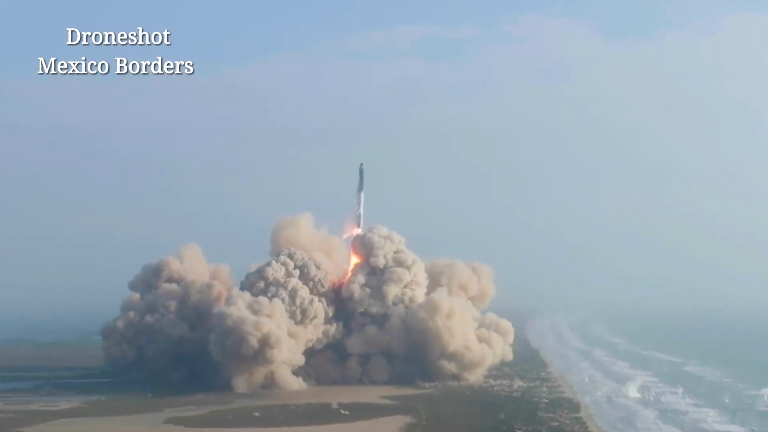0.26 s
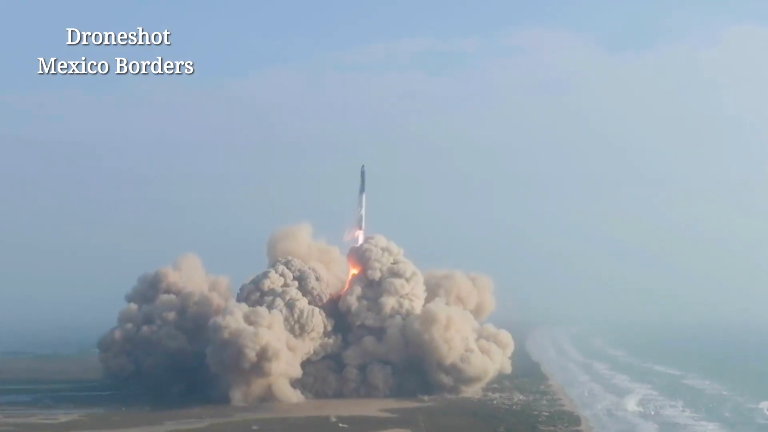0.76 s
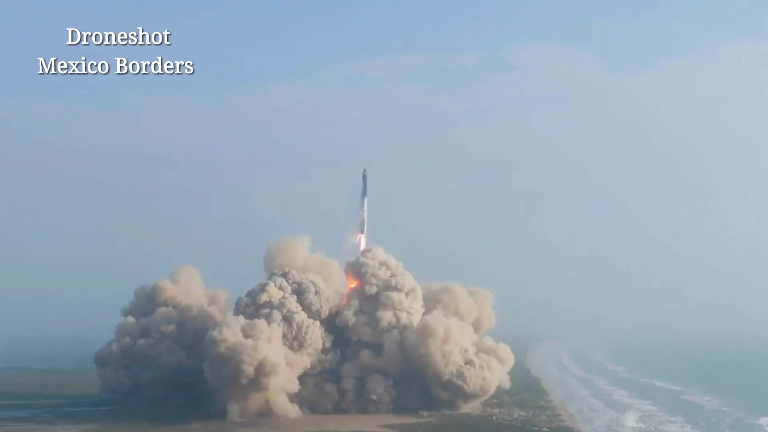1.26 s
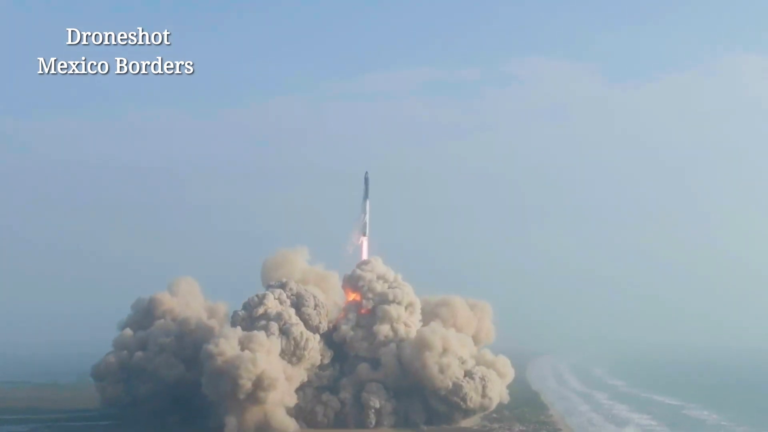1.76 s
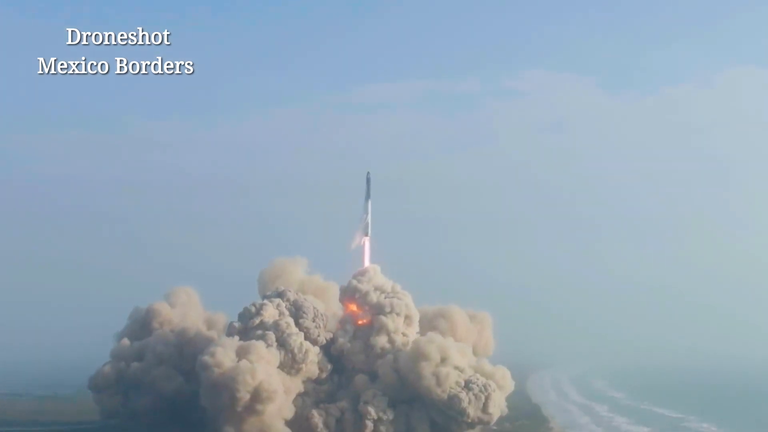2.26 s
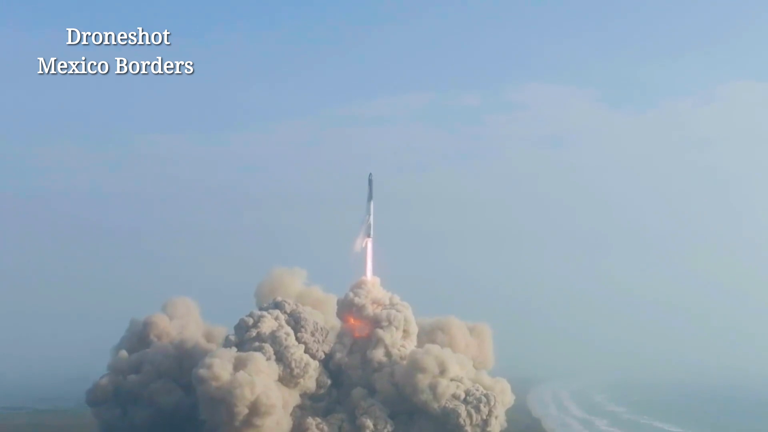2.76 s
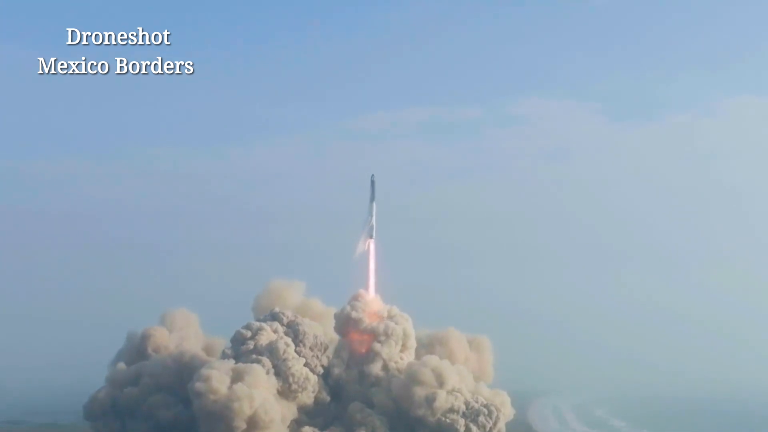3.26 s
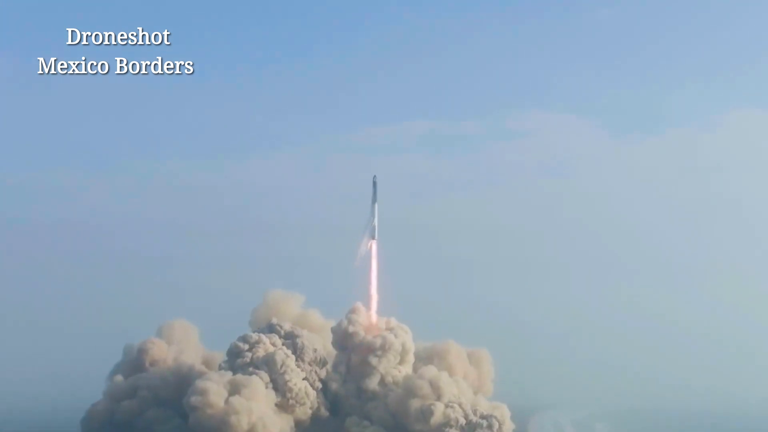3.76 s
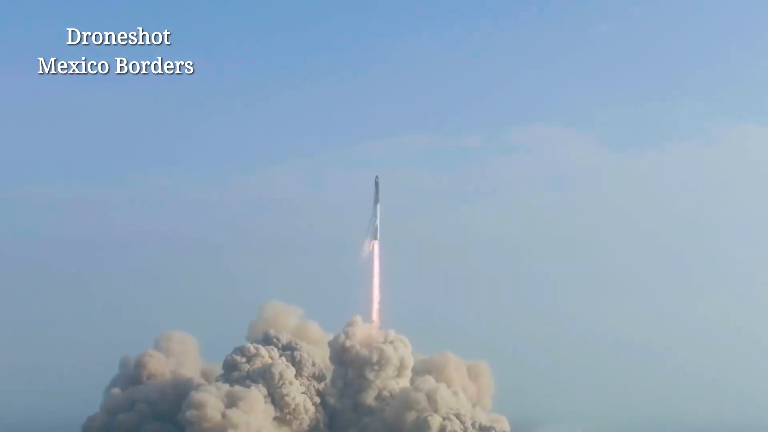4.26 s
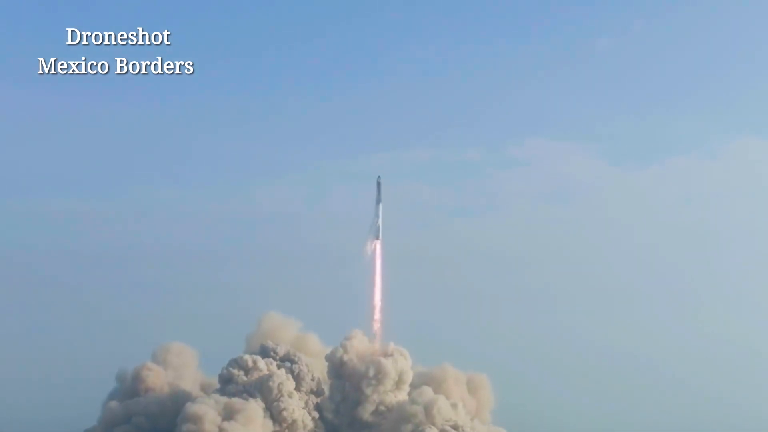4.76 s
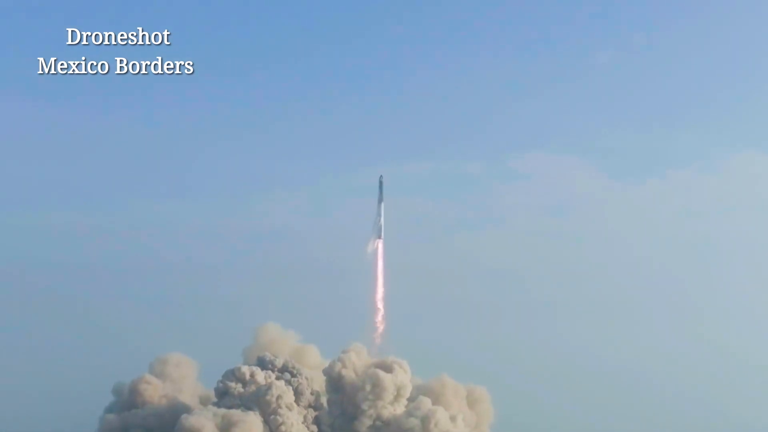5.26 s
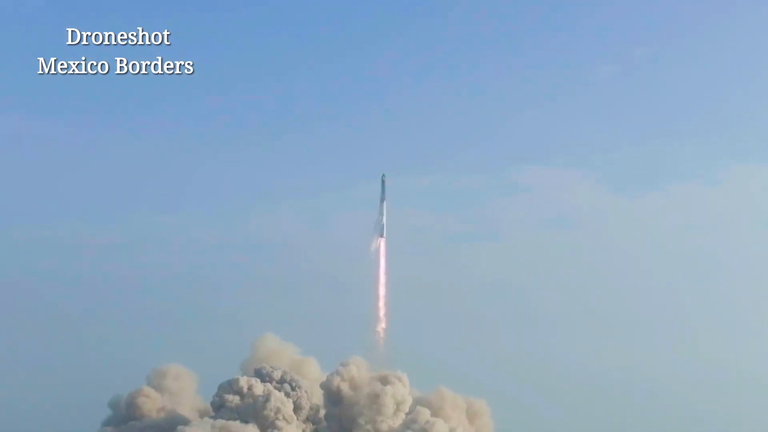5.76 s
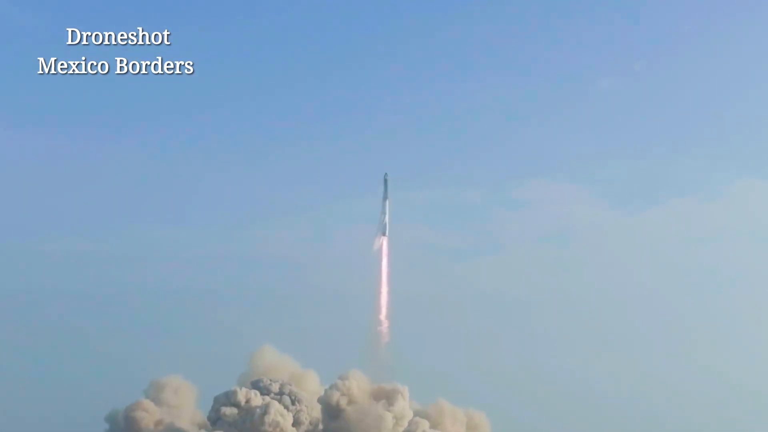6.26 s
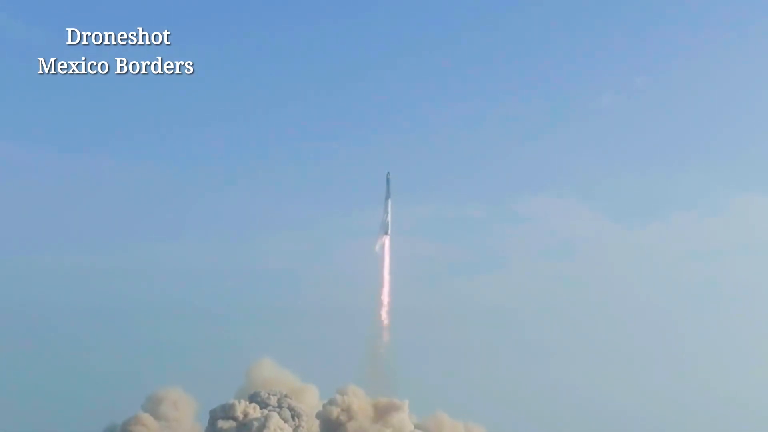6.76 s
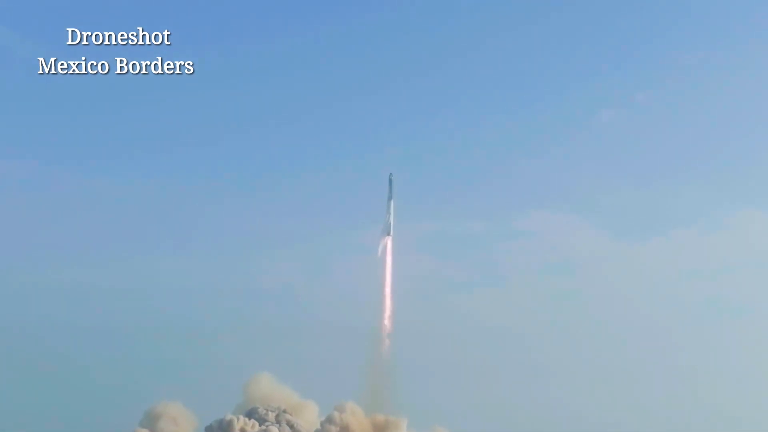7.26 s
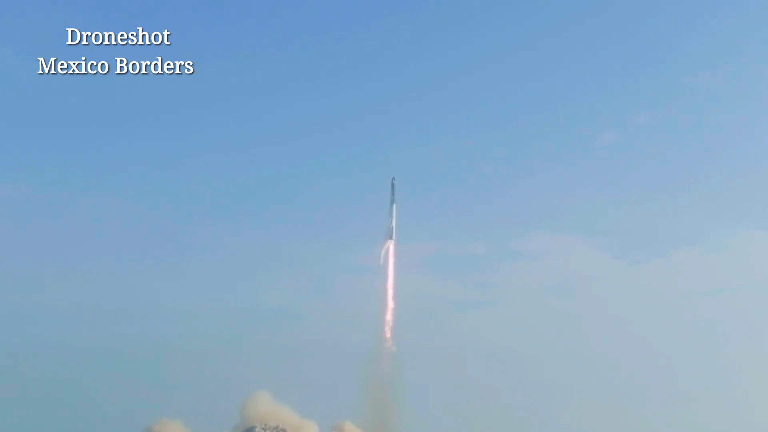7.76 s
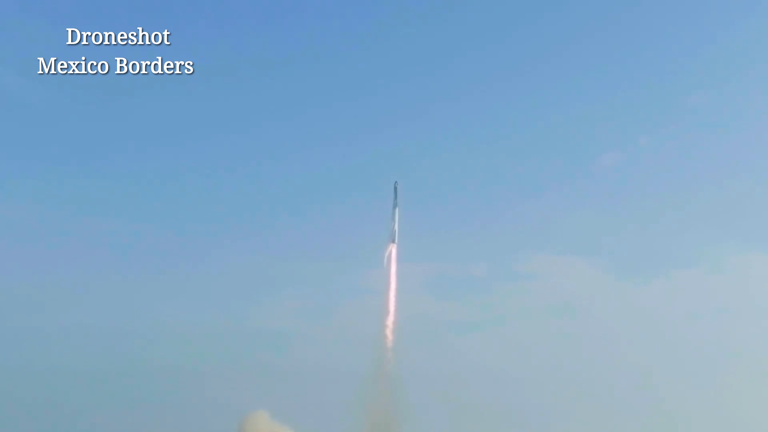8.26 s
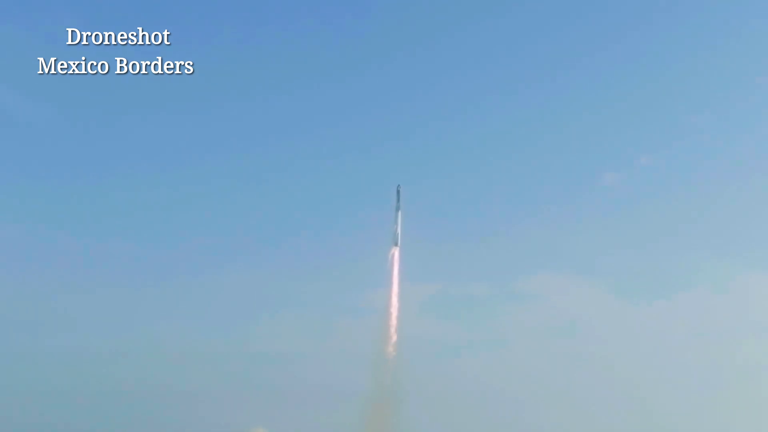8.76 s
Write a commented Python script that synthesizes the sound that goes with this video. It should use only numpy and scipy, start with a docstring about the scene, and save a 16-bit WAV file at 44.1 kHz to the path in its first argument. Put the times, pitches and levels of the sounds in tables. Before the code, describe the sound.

A huge rocket climbs far away over open coastal ground. From start to finish its exhaust makes a dense, ragged crackle, with sharp cracks and duller pops arriving irregularly over a deep, heaving rumble. The stronger cracks leave a very short, sputtering hiss. The sound holds a fairly even level, and the loudest cracks briefly overload the microphone.

```python
"""A ragged crackle over a deep rumble: a huge rocket climbing far away.
On the way its exhaust roar steepens into shock fronts, sudden pressure jumps that sag back slowly.
Each front arrives direct, off the ground and off two surfaces; the loud ones scatter into a short hiss.
Two microphone ports colour the sound, and the loudest cracks hit the microphone's ceiling."""
import sys
import numpy as np
from scipy import signal
from scipy.fft import rfft, irfft, next_fast_len
from scipy.io import wavfile
from scipy.ndimage import map_coordinates

SR = 44100
rng = np.random.default_rng(int(sys.argv[2]) if len(sys.argv) > 2 else 0)


def generate_wav(signal):
    """Clip the signal to [-1, 1] and save it as 16-bit WAV at the path in sys.argv[1]."""
    frames = np.transpose(np.atleast_2d(signal))
    scaled = np.clip(frames, -1, 1) * 32767
    pcm = np.round(scaled).astype(np.int16)
    wavfile.write(sys.argv[1], SR, pcm)


N = 397782


def amp(db):
    """Gain of a level in dB."""
    return 10 ** (np.asarray(db) / 20)


def unit_rms(x):
    """x at rms 1."""
    return x / np.sqrt(np.mean(x ** 2) + 1e-20)


def log_interp(points, hz):
    """Curve through (freq_hz, value) points on a log frequency axis."""
    freq_hz, value = np.transpose(points)
    return np.interp(np.log(hz + 1), np.log(freq_hz + 1), value)


def wobble(rate_hz):
    """Smooth random curve with rate_hz knots a second."""
    knots = rng.standard_normal(int(N * rate_hz / SR) + 4)
    return map_coordinates(knots, [np.arange(N) * rate_hz / SR])


def filtered(x, response):
    """x through a complex frequency response."""
    size = next_fast_len(N + SR // 2)
    hz = np.fft.rfftfreq(size, 1 / SR)
    return irfft(rfft(x, size) * response(hz), size)[..., :N]


# Stereo width of diffuse sound: freq_hz, side_to_mid_ratio
WIDTH = [(100, 0.25), (1000, 0.37), (4000, 0.45), (12000, 0.68)]

def diffuse_noise(spectrum):
    """Stereo noise of rms 1, most alike left and right in the bass."""
    def shape(hz):
        return amp(log_interp(spectrum, hz)) * np.array([np.ones_like(hz), log_interp(WIDTH, hz)])
    mid, side = filtered(rng.standard_normal((2, N)), shape)
    return unit_rms(np.array([mid + side, mid - side]))


# Roar contour: time_s, relative_level_db
RUMBLE_LEVEL = [(0.0, -27), (0.45, -32), (0.9, -31), (3.51, -29.5), (8.32, -32), (9.02, -29.5)]
# Roar spectrum: freq_hz, relative_density_db
RUMBLE_SPECTRUM = [(15, -29), (25, 1.5), (114, 7.5), (291, -3.5), (720, -23), (1070, -37.5), (1950, -40),
                   (3230, -46), (6000, -53.5), (7800, -64), (13200, -120)]

def rumble():
    """The unshocked low exhaust roar, heaving in lumps."""
    contour_db = np.interp(np.arange(N) / SR, *np.transpose(RUMBLE_LEVEL))
    heave_db = 2 * wobble(rate_hz=2.965) + 3 * wobble(rate_hz=15)
    return amp(contour_db + heave_db - 7) * diffuse_noise(RUMBLE_SPECTRUM)


def lull(depth_db=-3, reach_s=0.095):
    """Background gain: the rumble and weak crackle dip briefly around each loud crack."""
    start_s, level_db, _ = np.transpose(SHOCKS)
    jumps = np.bincount((start_s * SR).astype(int), amp(level_db), N)
    nearby = signal.fftconvolve(jumps, np.hanning(int(2 * reach_s * SR)), "same")
    return amp(depth_db * np.tanh(nearby))


# Scattered sound: freq_hz, relative_density_db
HISS_SPECTRUM = [(60, -8), (150, -1), (500, -2.5), (1200, -21), (2500, -28), (5000, -38), (10000, -46.5),
                 (16000, -63)]

def scattered_hiss(t60_s, steep_boost_db, sputter_db, attack_s=0.00028):
    """Sputtering hiss that dunes and air scatter after each loud front."""
    start_s, level_db, steepness = np.transpose(SHOCKS)
    power = np.bincount((start_s * SR).astype(int), amp(level_db + steep_boost_db * steepness) ** 2, N)
    t = np.arange(SR // 2) / SR
    power_decay = amp(-60 * t / t60_s) ** 2 * (1 - np.exp(-t / attack_s))
    envelope = np.sqrt(np.abs(signal.fftconvolve(power, power_decay)[:N]))
    sputter = amp(sputter_db * wobble(rate_hz=350))
    return envelope * unit_rms(sputter * diffuse_noise(HISS_SPECTRUM))


# Spells of fatter and thinner fronts: time_s, sag_factor
SAG_SPELLS = [(0, 0.71), (.6, 0.99), (1.1, 1.15), (1.6, 1.04), (2.1, 1), (2.7, 0.96), (3.3, 0.71),
              (4.2, 0.76), (4.6, 1.4), (5.2, 1.06), (5.6, 0.83), (5.8, 0.57), (6, 0.66), (6.2, 0.91),
              (6.9, 1.1), (7.5, 0.89), (8.1, 0.68), (8.5, 0.76), (9, 1.2)]

def sag_time_ms(start_s, level_db, steepness):
    """Time scale of each front's sag; weak and rounded fronts last longer."""
    typical = 0.95 - 0.11 * level_db + 0.59 * (1 - np.clip(steepness, 0, 1))
    spell = np.interp(start_s, *np.transpose(SAG_SPELLS))
    spread = np.exp(0.14 * rng.standard_normal(len(start_s)))
    return 1.37 * np.clip(typical * spell * spread, 0.3, 3.5)


def shock_pressure(fronts, build_ms, delay_ms=0):
    """Summed shock waves: each a jump, part sudden and part gradual, then a sag past zero."""
    start_s, level_db, steepness, sag_ms = (column[:, None] for column in fronts)
    arrival_s = start_s + np.reshape(delay_ms, (-1, 1)) / 1000
    steepness = np.clip(steepness, 0, 1)
    index = np.floor(arrival_s * SR).astype(int) + np.arange(-30, 900)
    age_ms = (index / SR - arrival_s) * 1000
    after_ms = np.maximum(age_ms, 0)
    rise_ms = 0.021 + 0.054 * (1 - steepness) ** 2  # air absorption rounds the front
    sudden = 0.5 + 0.5 * np.tanh(age_ms / rise_ms)
    gradual = sudden * (1 - np.exp(-after_ms / build_ms))
    progress = after_ms / sag_ms
    sag = (1 - 0.59 * progress) * np.exp(-progress ** 1.42)
    waves = amp(level_db) * (steepness * sudden + (1 - steepness) * gradual) * sag
    return np.bincount(np.clip(index, 0, N).ravel(), waves.ravel(), N + 1)[:N]


def reflection(x, delay_ms, gain_db, cutoff_hz):
    """x off a surface: delayed, weaker and duller."""
    def response(hz):
        return np.exp(-2j * np.pi * hz * delay_ms / 1000) / (1 + 1j * hz / cutoff_hz) ** 2
    return amp(gain_db) * filtered(x, response)


# Reflected paths, growing as the rocket climbs: time_s, ground_delay_ms, near_surface_delay_ms
PATH_DELAYS = [(0, 0.31, 7.16), (3, 0.35, 8.54), (5.2, 0.39, 8.74), (9, 0.46, 9.8)]
# Ground bounce at the left, right port: extra_delay_ms, gain_db, cutoff_hz
GROUND_BOUNCE = [(0, -3.5, 4300), (0, -4.5, 11000)]

def arrivals(start_s, level_db, steepness, build_ms):
    """Fronts heard direct, off the ground, off a nearby surface and off a larger, farther one."""
    fronts = (start_s, level_db, steepness, sag_time_ms(start_s, level_db, steepness))
    time_s, ground_ms, near_ms = np.transpose(PATH_DELAYS)
    turbulence = 1 + rng.standard_normal((len(start_s), 2)) * [0.035, 0.03]
    direct = shock_pressure(fronts, build_ms)
    ground = shock_pressure(fronts, build_ms, np.interp(start_s, time_s, ground_ms) * turbulence[:, 0])
    near = shock_pressure(fronts, build_ms, np.interp(start_s, time_s, near_ms) * turbulence[:, 1])
    ground_echo = np.array([reflection(ground, *bounce) for bounce in GROUND_BOUNCE])
    near_echo = reflection(near, delay_ms=0, gain_db=-6.5, cutoff_hz=224)
    far_echo = reflection(direct, delay_ms=19.3, gain_db=-5.5, cutoff_hz=48)
    return direct + ground_echo + near_echo + far_echo


def weak_shocks(count=480, floor_db=-35, spread_db=3.5, max_steepness=0.1):
    """Small, rounded fronts at random times, rarer the louder."""
    when, rank, edge = rng.random((count, 3)).T
    level_db = floor_db - spread_db * np.log(rank + 0.015)
    return arrivals(when * N / SR, level_db, max_steepness * edge, build_ms=0.16)


# Loud shock fronts: start_s, relative_level_db, steepness (0 rounded, 1 sudden)
SHOCKS = [(0.0058, -17, 0.21), (0.0432, -17, 0.33), (0.0834, -7, 0.47), (0.1194, -12.5, 0.6),
          (0.132, -18, 0.03), (0.1462, -17.9, 0.3), (0.1881, -15.5, 0.33), (0.1993, -9.3, 0.5),
          (0.2165, -7.5, 0.63), (0.2385, -15, 0.03), (0.2829, -13.5, 0.6), (0.2945, -17.5, 0.5),
          (0.363, -2, 0.55), (0.378, -14, 0.65), (0.3872, -17.5, 0.47), (0.4532, -7.5, 0.6),
          (0.4628, -10, 0.53), (0.5046, -14, 0.4), (0.5157, -9, 1), (0.5323, -15.5, 0.4), (0.6114, 6, 0.47),
          (0.7082, 3, 0.56), (0.803, 1.7, 0.61), (0.8561, -3.5, 0.48), (0.8985, -5.5, 0.5),
          (0.9452, -9, 0.63), (0.963, -10, 0.27), (0.9782, -14.4, 0.57), (1.0081, -21, 0.16),
          (1.0114, -12, 0.04), (1.0553, -10.5, 0.3), (1.0808, -15, 0.5), (1.0838, -7.9, 0.52),
          (1.1198, -5, 0.65), (1.1639, -5, 0.47), (1.1858, -21.5, 0.5), (1.2374, -13.5, 0),
          (1.2764, -17.5, 0.14), (1.293, -13, 0.4), (1.3481, -3.5, 0.75), (1.3843, -1.5, 0.56),
          (1.4306, -2.5, 0.42), (1.4976, -16, 0.25), (1.5026, -19.5, 0.3), (1.5067, -14, 0.18),
          (1.5623, -7.0, 0.86), (1.5855, -2.5, 0.78), (1.593, -11.5, 0.2), (1.6111, -18.5, 0.06),
          (1.7277, -18, 0.59), (1.7299, -6, 0.73), (1.7601, -9.5, 0.24), (1.7675, -5, 0.8),
          (1.7914, -19.3, 0.44), (1.8292, -19, 0.26), (1.8566, -10.5, 0.78), (1.9292, -11.5, 0.76),
          (1.9343, -8.8, 0.66), (1.9563, -9, 0.64), (1.9653, -17, 0.5), (1.993, -15, 0.2),
          (2.0498, -5.5, 0.6), (2.081, -23.0, 0.3), (2.0921, -10, 0.56), (2.0945, -12.5, 0.4),
          (2.1084, -15, 0.76), (2.1596, -5.5, 0.83), (2.2, -11.5, 0.52), (2.2257, -16.5, 0.22),
          (2.2594, -15, 0.65), (2.271, -4, 0.93), (2.3108, -9, 0.5), (2.3281, -11.5, 0.6),
          (2.3358, -19, 0.1), (2.36, -17, 0), (2.396, -17.4, 0.05), (2.404, -13, 0.51), (2.4375, -13, 0.3),
          (2.4633, -3, 0.51), (2.5618, -18, 0.05), (2.5651, -10.5, 0.3), (2.6053, -21, 0.4),
          (2.629, -17.5, 0.2), (2.665, -14, 0.4), (2.71, -0.8, 0.71), (2.7687, 0.0, 0.68),
          (2.804, -10.5, 0.3), (2.8886, -18.5, 0.25), (2.8967, -18.0, 0.31), (2.907, -1, 0.64),
          (2.9418, -15, 0.5), (3.0104, -7.5, 0.72), (3.0363, -11.5, 0.2), (3.0397, -9, 0.53),
          (3.0765, -8.5, 0.86), (3.173, -9.5, 0.84), (3.213, -13.2, 0.9), (3.2156, -5, 0.76),
          (3.3014, -1, 0.75), (3.338, -9, 0.7), (3.3793, -14.5, 0.2), (3.3863, -11, 0.55),
          (3.4184, -0.5, 0.73), (3.4329, -7, 0.58), (3.4517, -18, 0.25), (3.5069, -13.8, 0.5),
          (3.509, -13.5, 0.56), (3.5685, -8, 0.84), (3.5862, -7.5, 0.88), (3.6273, 3.5, 0.67),
          (3.647, -17.5, 0.66), (3.7004, 0, 0.79), (3.7786, -5.5, 0.77), (3.8219, -5.9, 1),
          (3.8484, -14.5, 0.5), (3.8541, -20, 0.8), (3.8774, -14, 0.5), (3.885, -5, 0.92),
          (3.917, -8.5, 0.63), (3.9359, -24.0, 0.4), (3.939, -15.5, 0.44), (4.017, -15.4, 0.66),
          (4.025, -2.5, 0.86), (4.0627, -6, 1), (4.081, -17.5, 0.53), (4.1355, -19.0, 0.5),
          (4.1457, -13, 1), (4.1528, -16.5, 0.77), (4.2217, -0.2, 0.79), (4.2936, -14, 0.3),
          (4.3046, -21, 0.36), (4.3074, -16, 0.56), (4.3337, -12, 0.57), (4.3983, -10.5, 0.72),
          (4.4687, -4, 0.62), (4.5536, -22.9, 0.5), (4.5855, -9.5, 0.85), (4.602, -12.5, 0.47),
          (4.622, -16.3, 0.5), (4.6726, -19, 0.05), (4.733, -11, 0.58), (4.7906, -4.9, 0.52),
          (4.9084, -2.5, 0.51), (4.9267, -17.9, 0.14), (4.9376, -20.5, 0.37), (5.0431, -11, 0.46),
          (5.0785, -11, 0.22), (5.1158, -15.5, 0.1), (5.1427, -12.7, 0.5), (5.182, -7.5, 0.45),
          (5.2124, -10, 0.38), (5.241, -15.5, -0.04), (5.351, -7.5, 0.1), (5.3538, -6.5, 0.48),
          (5.4199, -13.5, 0.1), (5.437, -0.6, 0.62), (5.5018, -9.5, 0.43), (5.5348, -12.0, 0.33),
          (5.6003, -3.5, 0.5), (5.631, -23, 0.65), (5.6417, -13, 0.4), (5.6572, -12.5, 0.57),
          (5.717, -17.5, 0.3), (5.7462, -2.5, 0.93), (5.7606, -19, 0.8), (5.78, -1.5, 0.87),
          (5.8025, -6.5, 1), (5.8489, -12.6, 0.53), (5.8717, -15.5, 0.2), (5.9366, 4.5, 0.57),
          (5.961, -20, 0.2), (5.9666, -13.5, 0.35), (5.9955, -7.5, 0.46), (6.0009, -19.8, 0.5),
          (6.0354, -15.5, 0.14), (6.1093, -8.5, 0), (6.1353, -17, 0.13), (6.169, -16, 0.18),
          (6.1934, -17, 0.37), (6.2012, -10.5, 0.38), (6.2622, -4, 0.6), (6.307, -20, 0.2),
          (6.312, -6.5, 0.59), (6.3885, -13.5, 0.57), (6.3979, -11.5, 0.32), (6.4467, -19, 0.53),
          (6.4486, -11, 0.42), (6.4865, -5.5, 0.37), (6.5182, -14, 0.15), (6.5514, -6.5, 0.48),
          (6.6186, -18, 0.35), (6.628, -21.0, 0.4), (6.6632, -7.5, 0.75), (6.6864, -12, 0.4),
          (6.7057, -20, 0.7), (6.7093, -19, 0.45), (6.735, -18.5, 0.86), (6.76, -16.5, 0.67),
          (6.8032, -14, 0.6), (6.84, -12, 0.73), (6.8782, -7.0, 0.8), (6.8907, -18.5, 0.6),
          (6.9872, -21.5, 0.4), (7.0193, -5.5, 1), (7.0689, -16, 0.6), (7.0814, -15, 0.61),
          (7.186, -13.5, 0.62), (7.1995, -13.5, 0.92), (7.2657, -19.5, 0.1), (7.2797, -12.5, 0.58),
          (7.2844, -19.1, 0.7), (7.3478, -8.5, 0.7), (7.4263, -6.5, 0.75), (7.4597, -12.5, 0.5),
          (7.5159, -10, 0.62), (7.536, -23, 0.32), (7.5438, -16.0, 0.46), (7.5489, -10, 0.39),
          (7.6114, -13, 0.43), (7.6759, -9, 0.1), (7.6987, -20.5, 0.12), (7.7423, 3, 0.56),
          (7.8252, -13, 0.51), (7.8758, -6.5, 0.48), (7.945, 1.5, 0.71), (7.9861, -14, 0.39),
          (8.0236, -10, 0.6), (8.0342, -9.5, 0.97), (8.0951, -7, 1), (8.1257, -11, 0.57),
          (8.146, -15.5, 0.3), (8.195, -21, 0.4), (8.2034, -5.4, 0.9), (8.2478, -11.5, 0.6),
          (8.294, -12.3, 0.63), (8.3087, -2.5, 0.75), (8.3975, -16.5, 0.6), (8.4325, -13, 0.5),
          (8.4464, -9.5, 0.85), (8.454, -8, 0.87), (8.4868, -15, 0.45), (8.557, -15, 0.36),
          (8.6006, -27.2, 0.5), (8.6177, -5.5, 0.8), (8.7016, -9, 0.1), (8.734, -19, 0.09),
          (8.7783, -7.5, 0.44), (8.839, -6.5, 0.43), (8.93, -12, 0.1), (9.0008, -22.6, 0.25)]

def loud_shocks():
    """The main cracks: exhaust roar steepened into strong fronts."""
    return arrivals(*np.transpose(SHOCKS), build_ms=0.22)


def scene():
    """Rumble, quick and lingering hiss, and the crackle."""
    quick_hiss = amp(-23.5) * scattered_hiss(t60_s=0.042, steep_boost_db=4, sputter_db=2)
    lingering_hiss = amp(-33.5) * scattered_hiss(t60_s=0.16, steep_boost_db=-0.5, sputter_db=3.5)
    background_gain = lull()
    crackle = amp(-3) * (loud_shocks() + background_gain * weak_shocks())
    return background_gain * rumble() + quick_hiss + lingering_hiss + crackle


# Cavity resonance of the left, right port: centre_hz, width_hz, gain_db
PORT_MODES = [(11600, 2260, 8.5), (11830, 2600, 5)]
# Housing resonances, common to both ports: centre_hz, width_hz, gain_db
HOUSING_MODES = [(1800, 1500, -8), (7870, 2040, 1)]

def microphone_ports(hz, left_lag_ms=0.0076, shelf_hz=335, shelf_db=4.54):
    """Response of two resonant ports; the left lags slightly, the right passes more bass."""
    def mode(centre_hz, width_hz, gain_db):
        damping = 1j * hz * width_hz
        return amp(gain_db) * damping / (centre_hz ** 2 - hz ** 2 + damping)
    housing = sum(mode(*row) for row in HOUSING_MODES)
    resonances = np.array([1 + mode(*row) + housing for row in PORT_MODES])
    left_lag = np.exp(-2j * np.pi * hz * left_lag_ms / 1000)
    right_shelf = (amp(shelf_db) + 1j * hz / shelf_hz) / (1 + 1j * hz / shelf_hz)
    return resonances * [left_lag, right_shelf]


def bass_cut(hz, edge_hz=16, q=1.43, pole_hz=18):
    """Second-order and first-order high-pass in series."""
    s = 1j * hz / edge_hz
    return s * s / (1 + s / q + s * s) * 1j * hz / (pole_hz + 1j * hz)


def record(dry, ceiling=0.96, top_hz=16700, taper_hz=600):
    """Ports and bass cut, a hard ceiling, then the band limit."""
    coloured = filtered(dry, lambda hz: microphone_ports(hz) * bass_cut(hz))
    limited = coloured / (1 + np.abs(coloured / ceiling) ** 7) ** (1 / 7)
    return filtered(limited, lambda hz: np.clip((top_hz - hz) / taper_hz, 0, 1))


dry = scene()
out = record(dry)
generate_wav(out)
```